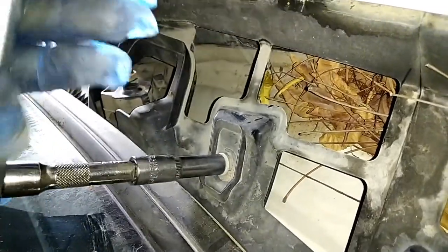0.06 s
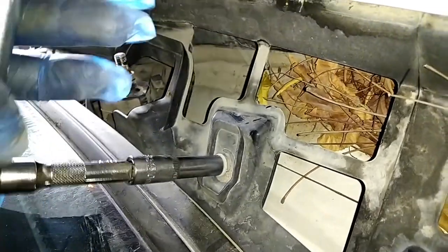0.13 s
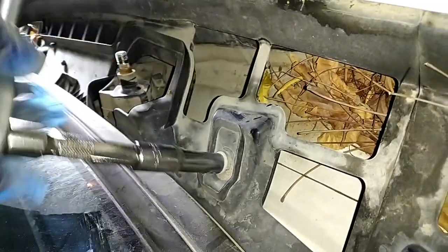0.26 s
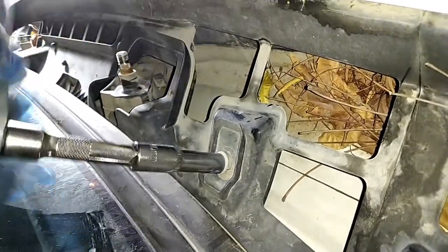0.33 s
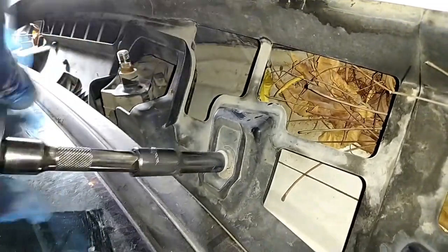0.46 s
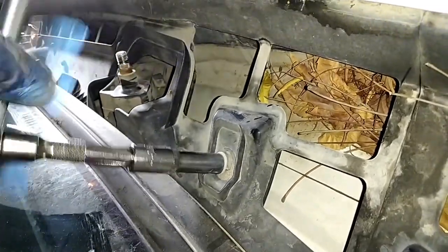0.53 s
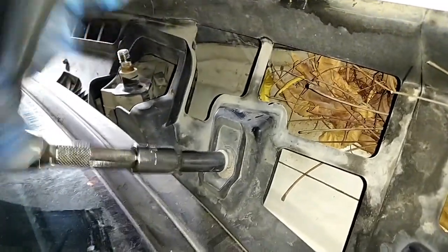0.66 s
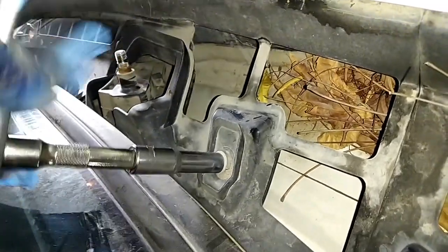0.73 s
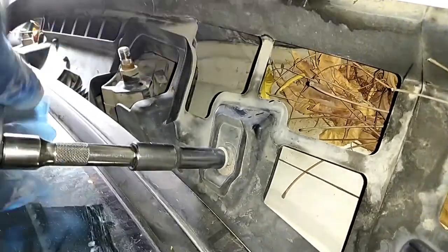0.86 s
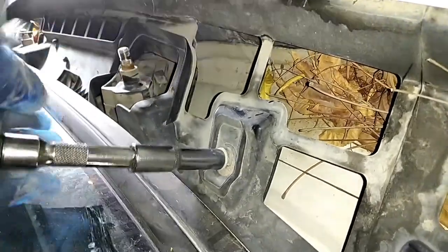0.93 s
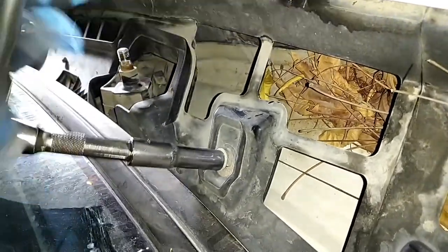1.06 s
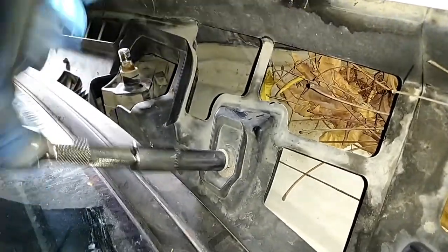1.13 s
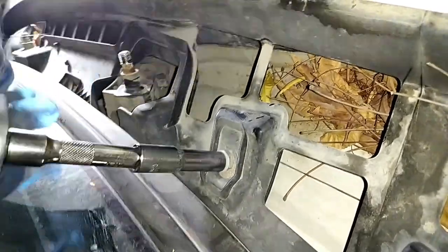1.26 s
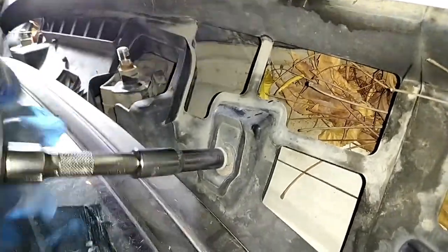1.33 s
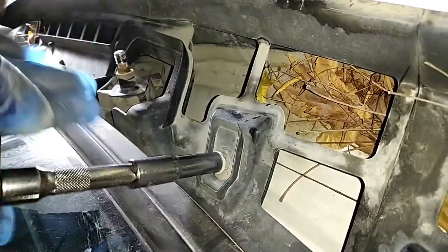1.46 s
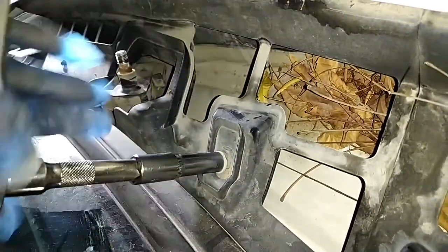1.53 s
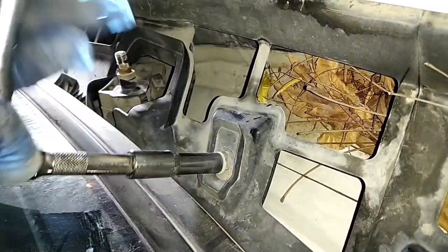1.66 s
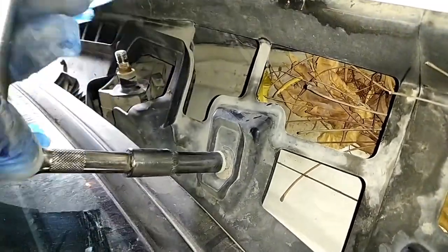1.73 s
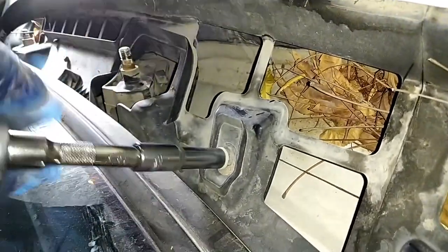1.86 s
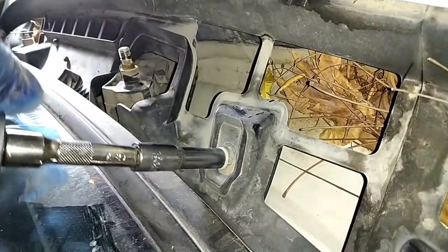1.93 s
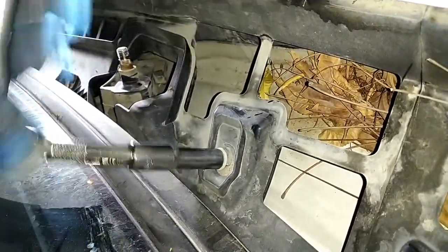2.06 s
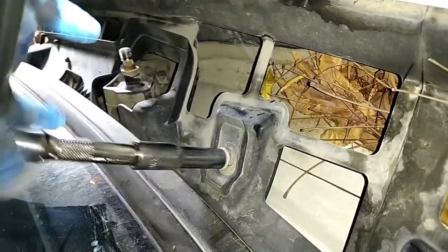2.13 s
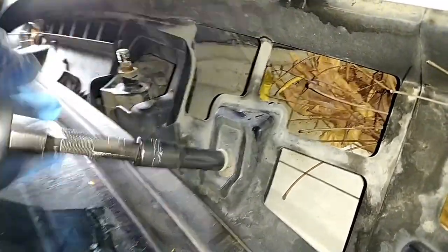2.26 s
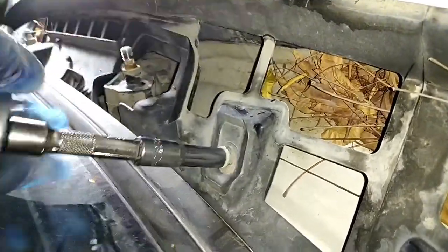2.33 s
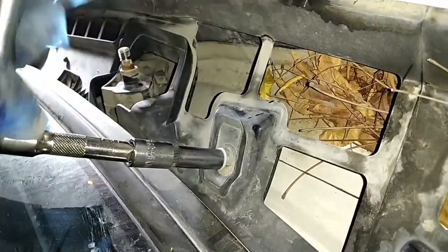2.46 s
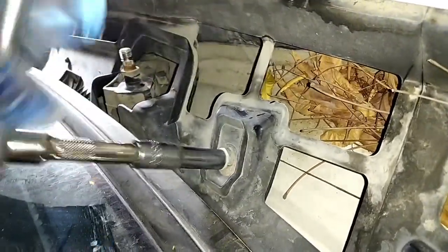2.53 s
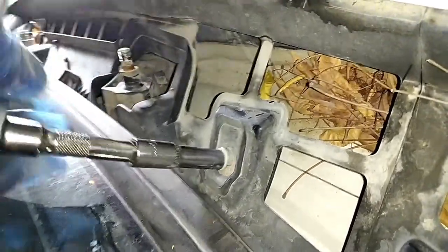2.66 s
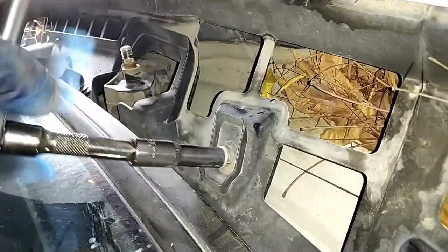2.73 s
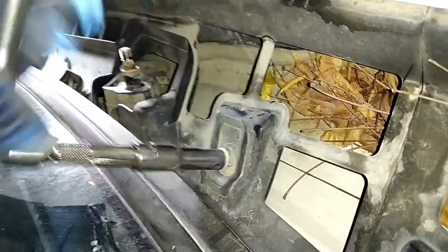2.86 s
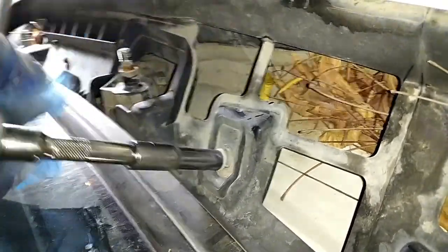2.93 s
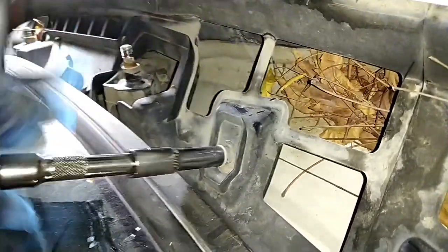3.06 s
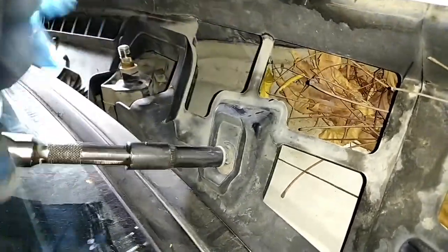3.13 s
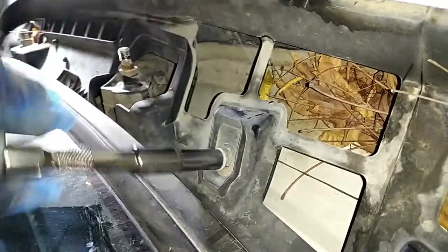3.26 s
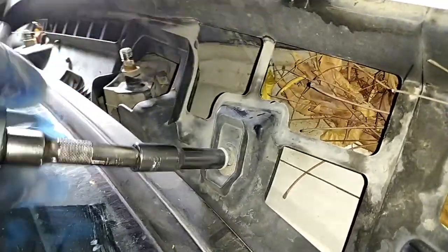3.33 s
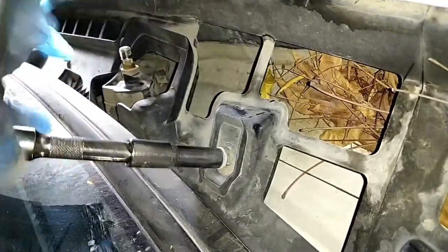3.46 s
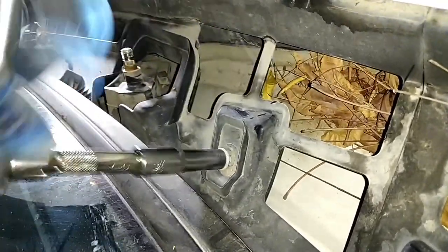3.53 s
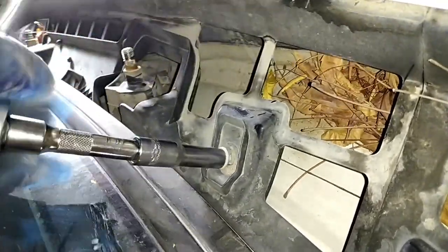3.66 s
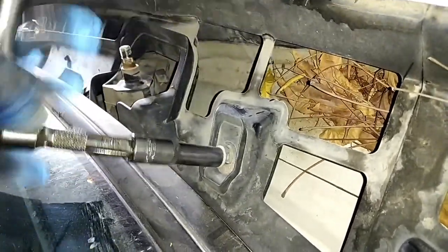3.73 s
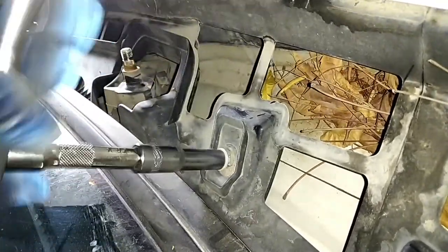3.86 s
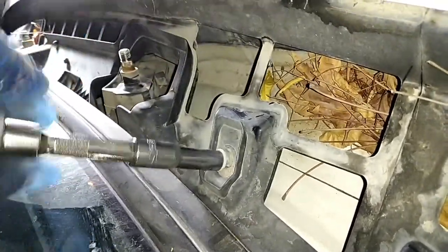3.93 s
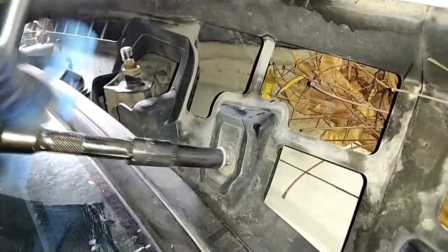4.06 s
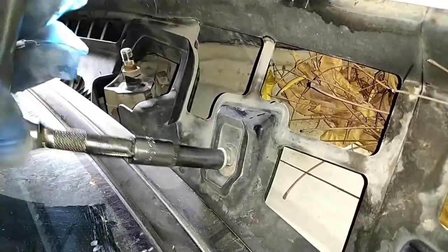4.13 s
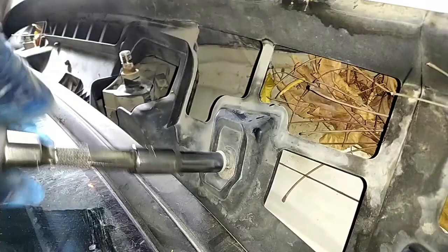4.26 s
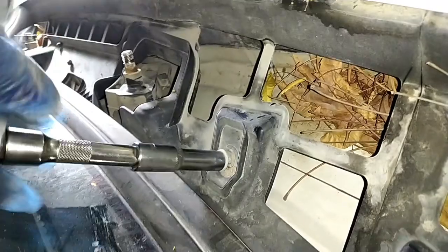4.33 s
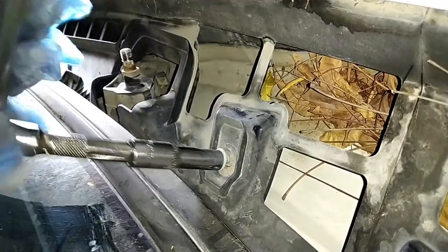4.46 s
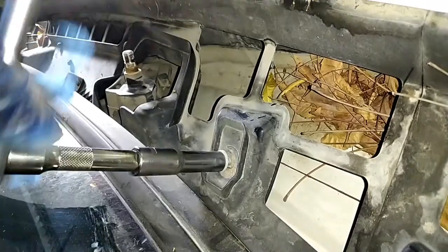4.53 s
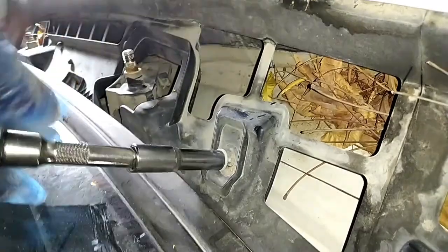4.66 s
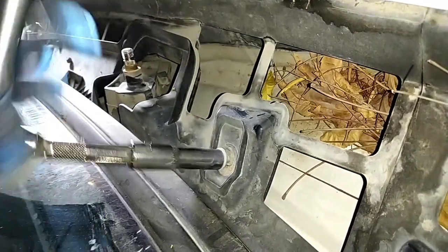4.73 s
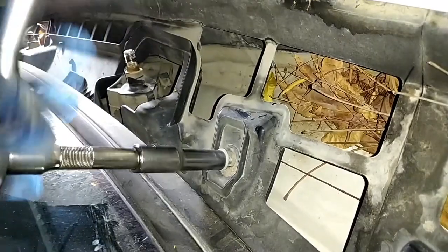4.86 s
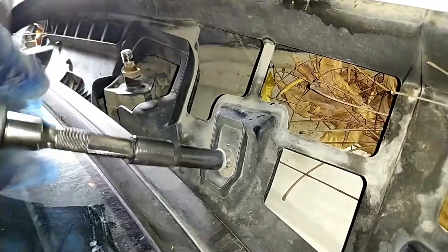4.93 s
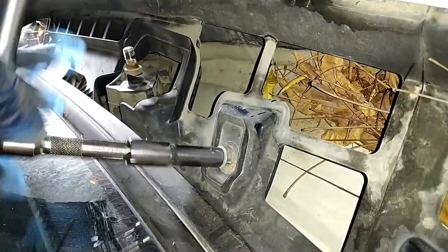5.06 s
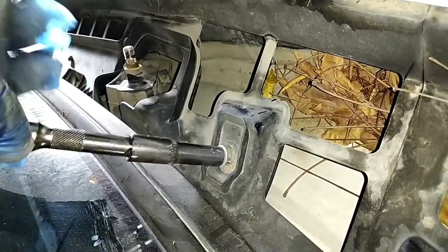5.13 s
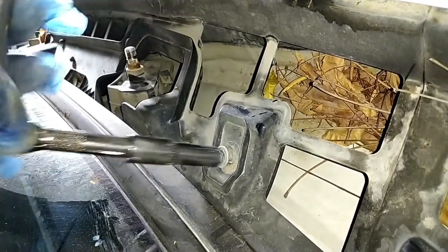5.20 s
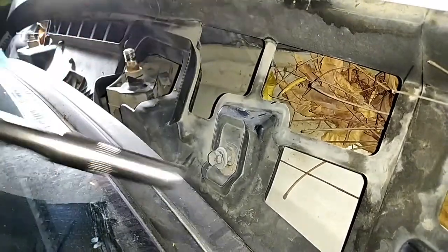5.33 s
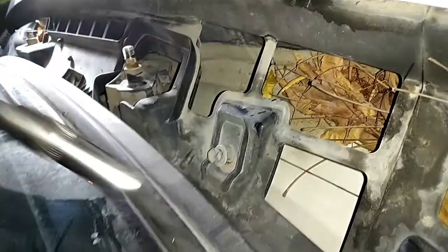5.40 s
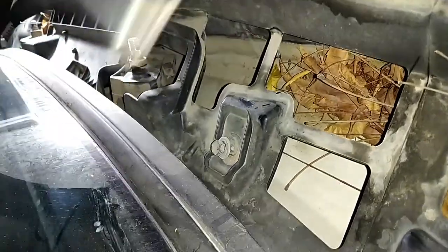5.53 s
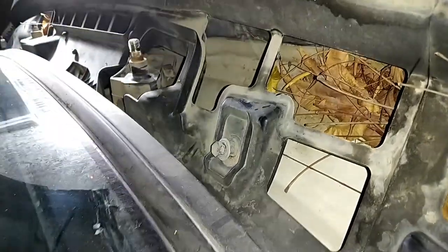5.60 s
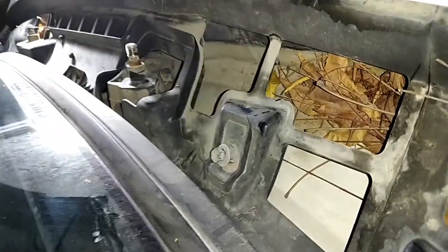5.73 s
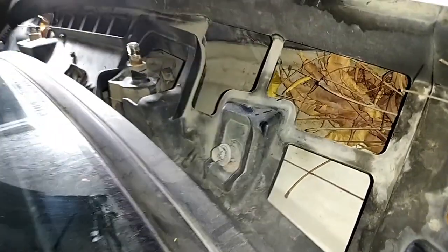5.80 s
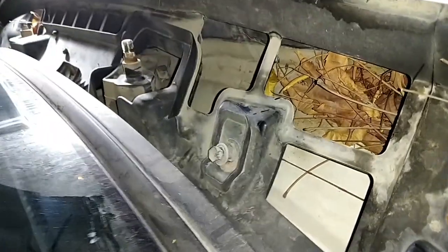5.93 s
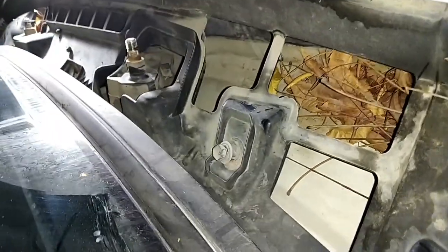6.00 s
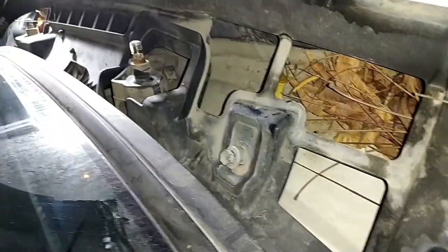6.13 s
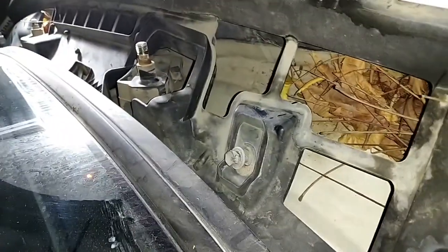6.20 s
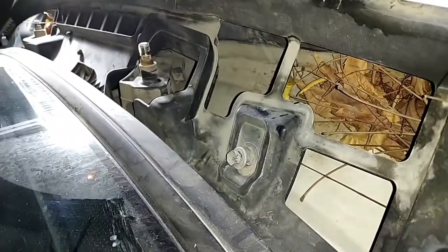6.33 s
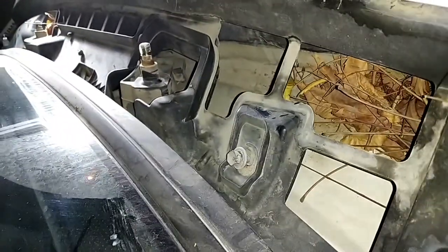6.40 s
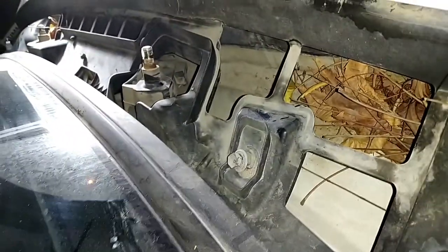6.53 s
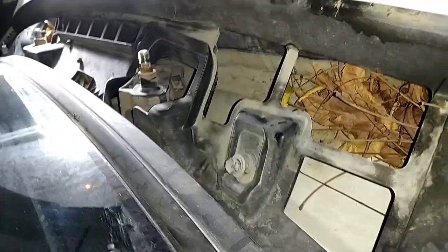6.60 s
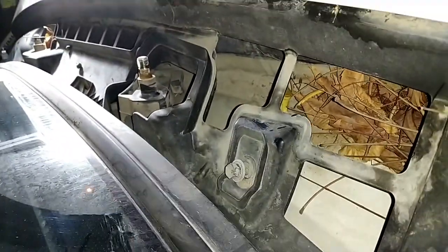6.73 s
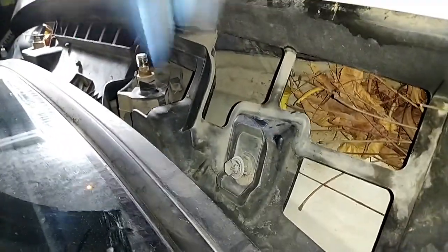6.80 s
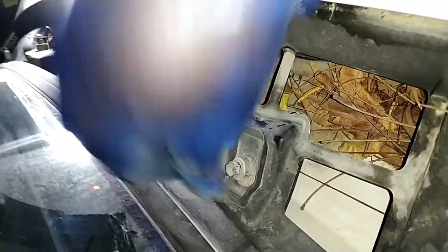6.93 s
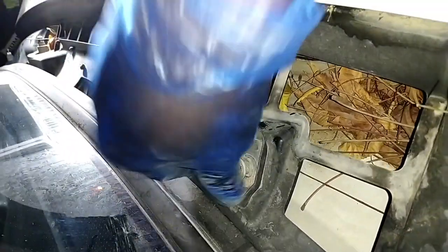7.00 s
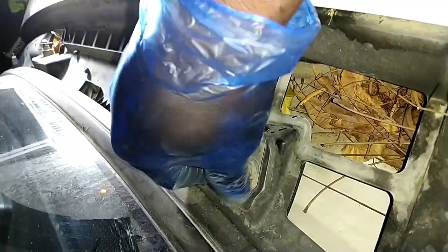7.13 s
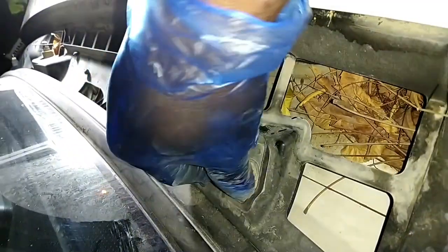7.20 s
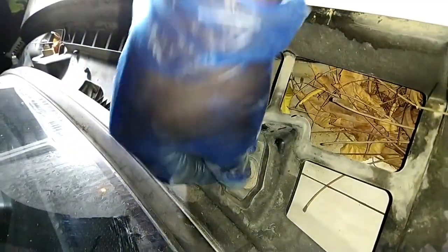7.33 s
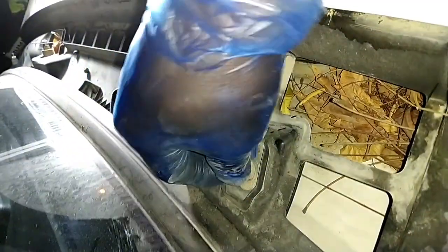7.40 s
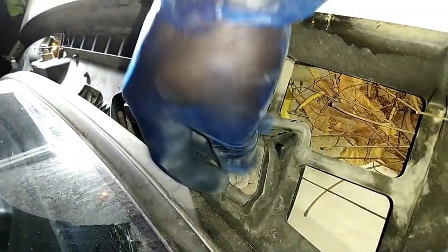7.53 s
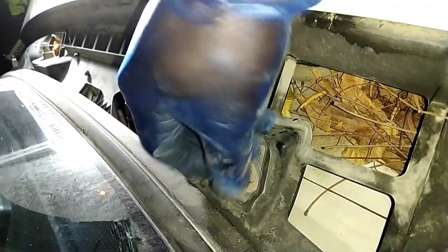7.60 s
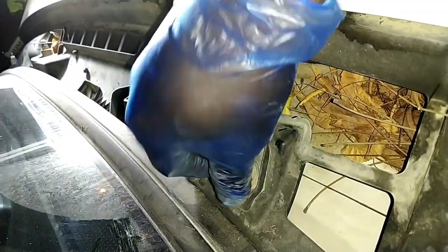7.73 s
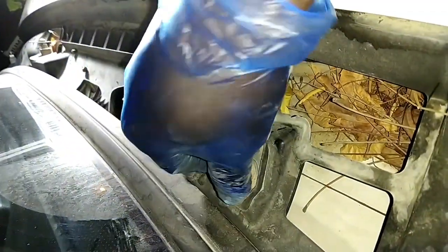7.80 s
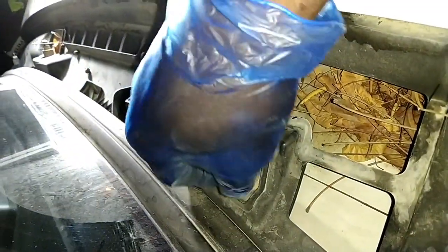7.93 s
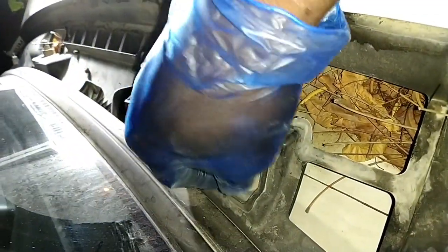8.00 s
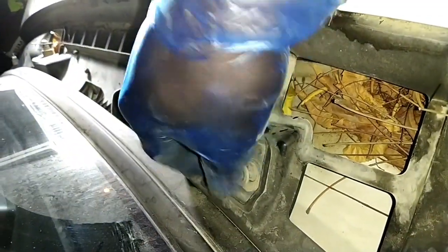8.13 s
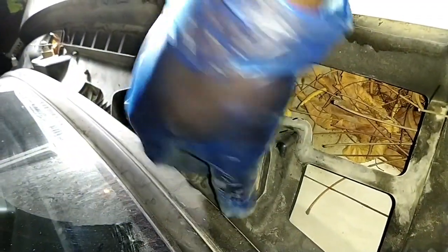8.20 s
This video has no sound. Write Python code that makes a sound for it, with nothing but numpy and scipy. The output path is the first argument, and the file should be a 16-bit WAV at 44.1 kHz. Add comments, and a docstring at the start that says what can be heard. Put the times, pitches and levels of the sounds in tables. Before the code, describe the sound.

A socket ratchet clicks in short fast bursts while a loose metal bracket knocks and rattles, then the tool lands with one booming clang.

```python
"""A socket ratchet backs a bolt out of a car's sheet-metal cowl in a workshop.
The thread rubs by stick-slip under a far rush of noise; loose joints knock the bolt's bracket into modal ringing,
and on each return swing steel impacts sound as the pawl snaps over a few teeth.
Soft bumps and one scrape on a metal edge fall between; then a far insect trills by pulsed tone bursts.
Last, the tool lands on a panel whose modes boom, and glove creases rustle as the rush swells."""
import sys
import numpy as np
from scipy import signal
from scipy.fft import rfft, irfft
from scipy.io import wavfile
from scipy.ndimage import uniform_filter1d

SR = 44100
rng = np.random.default_rng(int(sys.argv[2]) if len(sys.argv) > 2 else 0)


def wav_out(sig):
    """Save sig, one row per channel (or a flat mono array), as 16-bit PCM at SR to the path in sys.argv[1]."""
    wavfile.write(sys.argv[1], SR, np.round(np.clip(np.atleast_2d(sig).T, -1, 1) * 32767).astype(np.int16))


N = 364701
TIME = np.arange(N) / SR


def from_db(db):
    """Logarithmic level: decibels to amplitude gain."""
    return 10 ** (np.asarray(db) / 20)


def rms_one(x):
    """Power normalisation: scale to unit rms."""
    return x / np.sqrt(np.mean(x ** 2) + 1e-20)


def curve(rows):
    """Linear interpolation: a control joined by straight lines in time."""
    return np.interp(TIME, *np.transpose(rows))


def level_curve(rows):
    """Amplitude envelope: a gain from (t/s, level/dB) rows, at -120 dB outside their span."""
    s, db = np.transpose(rows)
    return from_db(np.interp(TIME, s, db, left=-120, right=-120))


def delayed(x, seconds):
    """Propagation delay: the same sound a little later."""
    return np.pad(x, [(0, 0)] * (x.ndim - 1) + [(int(seconds * SR), 0)])[..., :N]


def colour(x, points):
    """Minimum-phase filtering: the cepstrum is folded to make a causal response through (f/Hz, dB) points."""
    size = 8192
    hz, db = np.transpose(points)
    grid = np.arange(size // 2 + 1) * SR / size + 1
    cepstrum = irfft(np.log(from_db(np.interp(np.log(grid), np.log(hz), db))))
    cepstrum[1:size // 2] *= 2
    cepstrum[size // 2 + 1:] = 0
    response = irfft(np.exp(rfft(cepstrum)))
    return signal.oaconvolve(x, response[None], axes=1)[:, :x.shape[1]]


def shaped(x, points):
    """Spectral shaping that conserves the power of white noise."""
    hz, db = np.transpose(points)
    power = np.mean(from_db(np.interp(np.log(np.arange(1, SR // 2)), np.log(hz), db)) ** 2)
    return colour(x, points) / np.sqrt(power)


def pair(alike, size=N):
    """Interchannel coherence: white noise at two microphones with a given correlation."""
    alike = np.clip(alike, -1, 1)
    mid, side = rng.standard_normal((2, size))
    return np.sqrt((1 + alike) / 2) * mid + np.sqrt((1 - alike) / 2) * side * [[1], [-1]]


def flutter(rate, depth_db):
    """Random amplitude modulation: a wandering gain of unit rms."""
    knots = np.arange(0, N / SR + 1, 1 / rate)
    return rms_one(from_db(depth_db * np.interp(TIME, knots, rng.standard_normal(len(knots)))))


def strikes(times, db):
    """Impulsive excitation: one impulse per blow."""
    out = np.zeros(N)
    out[np.round(np.asarray(times) * SR).astype(int)] = from_db(db)
    return out


def dying(hits, t60):
    """Exponential decay: an envelope that jumps at each impulse and falls 60 dB in t60."""
    return signal.lfilter([1], [1, -from_db(-60 / (t60 * SR))], hits + 1e-18)


def ring(x, hz, t60):
    """Damped resonance: a unit impulse rings one mode with an envelope that starts at 1."""
    r, w = from_db(-60 / (t60 * SR)), 2 * np.pi * hz / SR
    return signal.lfilter([0, np.sin(w)], [1, -2 * r * np.cos(w), r * r], x + 1e-18)


def radiate(hits, hz, t60, spread):
    """Modal radiation: a mode reaches the two microphones with a phase difference of its own."""
    tone = ring(hits * rng.choice([-1, 1]), hz, t60)
    return np.array([delayed(tone, abs(spread * rng.normal()) / (2 * np.pi * hz)), tone])


def contacts(times, db, hz, t60, detune, spread):
    """Modal excitation: each contact swells a mode within about a cycle, at a slightly different pitch."""
    t = TIME[:int(t60 * SR)]
    swell = 1 - np.exp(-t * np.mean(hz) / 0.55)
    fading = from_db(-60 * t / t60) * swell * rng.choice([-1, 1])
    pitches = np.broadcast_to(hz, len(times))
    chance = rng.standard_normal((len(times), 2))
    out = np.zeros((2, N + SR))
    for s, gain, pitch, (shift, phase) in zip(times, from_db(db), pitches, chance):
        angle = 2 * np.pi * pitch * (1 + detune * shift) * t
        both = np.sin([np.maximum(angle - abs(spread * phase), 0), angle])  # the left lags in phase
        start = round(s * SR)
        out[:, start:start + len(t)] += gain * fading * both
    return out[:, :N]


def workshop(x, t60, dull_hz):
    """Diffuse reverberation: a tail duller than the direct sound and alike at both microphones in the bass."""
    t = TIME[:SR]
    mid, side = rng.standard_normal((2, SR)) * from_db(-60 * t / t60) * (t > .008)
    side = signal.sosfilt(signal.butter(1, 600, "high", fs=SR, output="sos"), side)
    tail = (mid + side * [[1], [-1]]) / np.sqrt(2 * np.sum(mid ** 2))
    tail = signal.lfilter(*signal.butter(1, min(dull_hz, SR / 3), fs=SR), tail)
    return signal.oaconvolve(x, tail, axes=1)[:, :N]


SWING_GAP_S = .1   # a longer pause between snaps begins a new swing


def teeth():
    """Event grouping: snap times of the pawl, split by swing."""
    s = np.transpose(PAWL_SNAPS)[0]
    return np.split(s, np.flatnonzero(np.diff(s) > SWING_GAP_S) + 1)


# how hard the hand works the wrench: [t/s, level/dB]
HAND_EFFORT = [(0, -18), (.11, -22), (.16, 0), (.3, -18), (.4, -3), (.66, -0.5), (.79, -19), (.9, -0.5),
               (1.27, -1), (1.42, -12.5), (1.82, -8.5), (2.03, -0.5), (3.1, 0), (3.65, -4), (4.12, -3.5),
               (4.5, 1), (5.04, -3), (5.18, -11), (5.3, -24)]
# modes of the cowl bracket that holds the bolt: [f/Hz, level/dB, t60/s]
BRACKET_MODES = [(154.5, -11.5, 0.17), (255, -10, 0.073), (341, -16, 0.08), (417.5, -2.5, 0.059),
                 (505, -6, 0.055), (604, -2.5, 0.044), (686.5, -5, 0.061), (876, -15.5, 0.1),
                 (1010, -15.5, 0.062), (1112, -13, 0.039), (1250, -16, 0.079), (1345, -7, 0.047),
                 (1550, -12, 0.025), (1742, -10.5, 0.048), (1820, -15.5, 0.074), (1970, -10.5, 0.045),
                 (2156, -4.5, 0.023), (2996, -4.5, 0.021)]
# spectrum of thread friction and of the slack's rattle: [f/Hz, density/dB]
RUB_SPECTRUM = [(150, -21.5), (250, -17), (321, -6), (425, -2.5), (538, -6.5), (682, -9.5), (795, -12),
                (1330, -19.5), (1620, -13), (1760, -18.5), (2570, -19.5), (3210, -16.5), (7000, -40),
                (9100, -58), (15400, -120)]
# spectrum of the panel's rumble: [f/Hz, density/dB]
RUMBLE_SPECTRUM = [(15, -47), (25, -17), (129, 4.5), (221, 0.5), (330, -4.5), (430, -24.5), (730, -120)]
# spectrum of the glove's rustle: [f/Hz, density/dB]
RUSTLE_SPECTRUM = [(400, -44.5), (1290, -18), (2100, -12), (2700, -17.5), (3900, -18.5), (4410, -12),
                   (4940, -16.5), (6410, -17.5), (10400, -6.5), (13900, -15.5), (14500, -22),
                   (15200, -81.5)]
RUB_DB, RUMBLE_DB, GRIP_DB = -41.5, -40, -51.5   # relative levels where the effort is 0 dB
RUMBLE_FOLLOWS = 0.62   # share of the effort's swing in dB
RETURN_DB = 3.5   # added to the rub between the first and last snap of a swing
# after each swing the working stroke bites, then eases off; BITE_DB is the added rub against the steady rub
BITE_DELAY_S, BITE_RISE_S, BITE_FALL_S, BITE_DB = 0.032, 0.024, 0.034, 5


def thread():
    """Stick-slip friction: random jerks ring the bracket, most at each bite; rumble and rustle follow effort."""
    effort = level_curve(HAND_EFFORT)
    bite, swinging = 0, 0
    for snaps in teeth():
        since = np.maximum(TIME - snaps[-1] - BITE_DELAY_S, 0)
        bite = bite + np.minimum(since / BITE_RISE_S, np.exp((BITE_RISE_S - since) / BITE_FALL_S))
        swinging = swinging + (TIME > snaps[0]) * (TIME < snaps[-1])
    rub = from_db(RUB_DB + RETURN_DB * swinging) * effort * (1 + from_db(BITE_DB) * bite)
    rumble = from_db(RUMBLE_DB) * effort ** RUMBLE_FOLLOWS
    rustle = from_db(GRIP_DB) * effort * (1 + 1.9 * bite)
    slips = (rng.random(N) < 90 / SR) * rng.standard_normal(N)   # about 90 a second
    jerks = rms_one(sum(from_db(level) * radiate(slips, hz, t60, 0.4)
                        for hz, level, t60 in BRACKET_MODES if hz < 1400))
    friction = shaped(pair(0.24) * flutter(90, 8.2), RUB_SPECTRUM)
    return (rub * from_db(-2.5) * (jerks + friction)
            + rumble * shaped(pair(1.0) * flutter(35, 4.2), RUMBLE_SPECTRUM)
            + rustle * shaped(pair(0.092) * flutter(150, 6.3), RUSTLE_SPECTRUM))


# the far rush swells toward the end: [t/s, relative level/dB]
RUSH_SWELL = [(0, -60), (5.42, -61), (5.85, -54.5), (6.8, -51.5), (7.3, -49.5), (7.7, -45.5), (8.0, -41),
              (8.27, -41.5)]
# hollow tone of the rush: [t/s, f/Hz, strength of the ground reflection 0-1]
HOLLOW_TONE = [(5.2, 1094, .85), (5.55, 920, 1), (5.85, 777, 0.4), (6.4, 849, 0.55), (6.9, 937, 0.02),
               (7.4, 969, 0.06), (8.27, 894, 0)]
# low part of the rush, also the landing's drone: [f/Hz, density/dB]
LOW_SPECTRUM = [(15, -96), (25, -51), (32, -27), (54, -17), (77, -6), (150, -6.5), (188, -3.5), (264, -3),
                (385, -15), (450, -12), (580, -35.5), (990, -120)]
# middle part of the rush: [f/Hz, density/dB]
MIDDLE_SPECTRUM = [(210, -24), (350, 6), (388, -7), (554, 5.5), (729, -1.5), (807, 3.5), (1230, -3),
                   (2610, -19), (4000, -20.5), (5200, -55.5), (8800, -120)]
MID_RUSH_DB, MID_RUSH_FOLLOWS = -41.5, 1.14   # at its fullest; share of the swell in dB


def far_rush():
    """Comb filtering: broadband noise meets its ground reflection, delayed by one period of a drifting tone."""
    rush_db = curve(RUSH_SWELL)
    low = from_db(rush_db + 4.0)
    middle = from_db(MID_RUSH_DB + MID_RUSH_FOLLOWS * (rush_db - rush_db.max()))
    whoosh = low * shaped(pair(0.96), LOW_SPECTRUM) + middle * shaped(pair(0.47), MIDDLE_SPECTRUM)
    tone_hz, ground = (curve(np.array(HOLLOW_TONE)[:, [0, k]]) for k in (1, 2))
    reflected = np.array([np.interp(TIME - 1 / tone_hz, TIME, side) for side in whoosh])
    rush = (whoosh + ground * reflected) / np.hypot(1, ground)
    # narrow noise is carried up to the tone's pitch
    narrow = signal.sosfilt(signal.butter(4, 125, fs=SR, output="sos"), pair(0.46))
    hollow = rms_one(narrow * np.cos(2 * np.pi * np.cumsum(tone_hz) / SR))
    return rush + from_db(-57.5) * hollow * (TIME > HOLLOW_TONE[0][0])


def crinkle():
    """Crackling noise: steady noise plus tiny creases of very uneven size; unit rms."""
    creases = (rng.random(N) < 260 / SR) * from_db(3.24 * np.minimum(rng.exponential(1, N), 4))
    return rms_one(pair(0.22) * (3.0 + dying(creases, 0.025)))


# the glove slides and creases: [middle t/s, half length/s, relative level/dB]
GLOVE_SLIDES = [(0.11, 0.037, -53.5), (0.347, .015, -53), (0.672, 0.028, -51), (2.5, 0.01, -69),
                (3.478, 0.021, -46), (4.567, 0.039, -69), (4.76, 0.017, -41), (5.448, 0.0078, -41.5),
                (5.55, 0.32, -54), (6.437, 0.029, -45.5), (6.913, 0.0096, -52), (7.003, 0.014, -49.5),
                (7.388, 0.031, -44), (7.662, 0.052, -52), (7.989, 0.03, -44), (8.169, 0.0088, -44)]
# light brushes and touches of tool and glove: [t/s, relative level/dB]
LIGHT_TOUCHES = [(5.436, -58), (5.908, -28), (6.2287, -34.5), (6.511, -26), (7.3562, -39), (7.9618, -44),
                 (8.1577, -41)]
HISS_DB = -62   # steady rustle, on the same scale as the slides


def glove():
    """Modulated crackle and decaying noise: the glove rustles and lightly touches."""
    rustle = from_db(HISS_DB)
    for s, half, db in GLOVE_SLIDES:
        rustle = rustle + from_db(db) / np.hypot(1, ((TIME - s) / half) ** 2)
    creasing = from_db(-2.0) * rustle * shaped(crinkle() * flutter(30, 1.7), RUSTLE_SPECTRUM)
    s, db = np.transpose(LIGHT_TOUCHES)
    touches = shaped(pair(0.13) * dying(strikes(s, db), 0.4) * flutter(300, 1.4),
                     [(200, -45), (1400, 12.0), (2700, 2.5), (4000, 1.5), (7000, -6.5),
                      (10500, 1.0), (15000, -25)])
    return creasing + from_db(-14.0) * touches


# the extension takes up its slack and knocks the bolt:
# [t/s, relative level/dB, hardness/dB, strongest ring f/Hz]
BOLT_KNOCKS = [(0.137, -25, 3.5, 420), (0.152, -24.5, 3, 440), (0.175, -21.5, -5, 420),
               (0.206, -21, -3, 410), (0.383, -7, -3.5, 426), (0.586, -21.5, -1, 390),
               (0.609, -11, -6.5, 410), (0.649, -15, 2.5, 420), (0.867, -8.5, 1, 395),
               (1.059, -16.5, -1.5, 400), (1.15, -17, 2.5, 460), (1.176, -21.5, -8, 440),
               (1.213, -17, -19, 605), (1.25, -8.5, -2, 400), (1.364, -26, -8, 432),
               (1.613, -26.5, -8, 410), (1.709, -29.5, -17, 272), (1.77, -24.0, -1, 430),
               (1.86, -22.0, -5, 470), (1.891, -9.0, 1, 409), (2.063, -12.5, -8.5, 406),
               (2.084, -19.5, 4, 675), (2.171, -23.5, 6, 403), (2.21, -16, -6.5, 418),
               (2.249, -16, -14, 270), (2.431, -15.5, -4, 400), (2.478, -21.5, 3.5, 412),
               (2.503, -27, 1, 710), (2.578, -20, -3, 378), (2.604, -14, 6.5, 424), (2.76, -17.5, 0, 635),
               (2.778, -17, -15, 467), (2.803, -17.5, 4, 425), (2.843, -26, 5, 410), (2.944, -5.5, 3, 420),
               (3.091, -23.5, 8.5, 340), (3.131, -21.5, 4, 422), (3.143, -15.5, -5, 410),
               (3.159, -18.0, -9, 407), (3.201, -19.0, -7, 380), (3.23, -21.5, -13, 567),
               (3.251, -20.5, -1, 670), (3.422, -16, -1, 230), (3.468, -21, -2, 280), (3.514, -17, -6, 420),
               (3.532, -30, 1, 430), (3.567, -21, 6.5, 500), (3.739, -27.5, -21, 410),
               (3.812, -12, -4.5, 456), (3.841, -22.5, 2, 676), (3.862, -19, -5, 614),
               (3.885, -20.5, -9, 390), (3.923, -5.5, 6, 406), (4.084, -17.5, 7.5, 435),
               (4.196, -24, 5.5, 680), (4.253, -14, -1, 356), (4.284, -21, 1, 404), (4.402, -20, -12, 493),
               (4.419, -22.5, 8, 620), (4.437, -19.5, 5, 355), (4.464, -24, 6, 393),
               (4.51, -21.0, 1.5, 442), (4.535, -29, -9, 460), (4.565, -15, -9, 666), (4.588, -20, 2, 428),
               (4.649, -25.5, 6, 300), (4.755, -15, 0.5, 453), (4.768, -19.5, -6, 424),
               (4.836, -9.5, -1.5, 450), (4.898, -13, -0.5, 675), (4.945, -15.5, 6, 424),
               (4.987, -24.5, -2, 620), (5.1, -14, -6.5, 240)]
LIGHT_KNOCK_DB, BASS_LAG = -19.5, 0.27   # bass grows less than the blow: dB lost per dB above a light knock
HARDNESS_PIVOT_HZ, HARDNESS_TOP_HZ = 422, 1400   # hardness tilts about the pivot, in full from the top upward
FAVOUR_DB, FAVOUR_WIDTH = 4.5, 0.11   # the load favours modes near one pitch; width as a share of that pitch
GRIP_DETUNE = 0.01   # typical share by which pitch shifts between contacts as grip and load change
REBOUND_DULL_DB = 5   # the slack rebounds more softly than it first strikes: loss in the high modes


def bracket():
    """Modal synthesis: a knock rings the bracket, a hard one more in its high modes, and the slack rattles."""
    s, db, hard, ring_hz = np.transpose(BOLT_KNOCKS)
    bass = -BASS_LAG * (db - LIGHT_KNOCK_DB)
    rebounds = s[:, None] + np.cumsum(rng.uniform(0.002976, .012, (len(s), 3)), axis=1)
    times = np.column_stack([s, rebounds])
    weaker = np.append(0, -11 - 4 * np.arange(3))
    ringing = 0
    for hz, level, t60 in BRACKET_MODES:
        tilt = min(np.log(hz / HARDNESS_PIVOT_HZ) / np.log(HARDNESS_TOP_HZ / HARDNESS_PIVOT_HZ), 1)
        favour = np.exp(-(np.log(hz / ring_hz) / FAVOUR_WIDTH) ** 2)
        first = db + level + bass * (hz < 300) + hard * tilt + FAVOUR_DB * favour
        strength = first[:, None] + weaker - REBOUND_DULL_DB * max(tilt, 0) * (weaker < 0)
        strength = strength + 2.46 * rng.standard_normal(times.shape)
        pitch = np.repeat(hz + favour * (ring_hz - hz), times.shape[1])
        ringing = ringing + contacts(times.ravel(), strength.ravel(), pitch, t60, GRIP_DETUNE, spread=0.28)
    rattle = shaped(pair(0.58) * dying(strikes(s, db), 0.083) * flutter(250, 3.8), RUB_SPECTRUM)
    return from_db(-9.0) * ringing + from_db(-16.5) * rattle


# spectrum of the steel ratchet head: [f/Hz, density/dB]
STEEL_SPECTRUM = [(150, -21.5), (420, 5.5), (900, -5), (1350, -5), (1900, -1.5), (2550, -9), (3200, 4),
                  (3700, -1.5), (5000, 2.5), (6100, -4), (7100, -1.5), (8300, -1.5), (10100, 8.5),
                  (12000, 3.5), (13200, 2), (14300, 0), (16000, -4)]
# longer modes of ratchet head and extension: [f/Hz, level/dB, t60/s]
HEAD_MODES = [(1342, -8.5, 0.085), (1780, -13.5, 0.098), (3210, -10.5, 0.038), (4170, -10.5, 0.048),
              (4920, -8.5, 0.021), (5030, -5.5, 0.04), (5800, -19, 0.05), (6910, -7.5, .029),
              (7470, -2.5, 0.023), (10170, -0.5, 0.015), (10090, 11, 0.0074), (12200, -15, .04),
              (12316, -7, .04), (12900, -10.5, .045)]
SNAP_RISE_S = 0.00095   # the head takes a moment to sound in full


def steel(rows, t60, chatter_db, ring_db, bounce_s, bounce_db):
    """Impact and modal density: steel strikes, bounces once, and rings dense short modes and a few longer ones."""
    s, db = np.transpose(rows)
    chance = rng.standard_normal((len(s), 2))
    bounces = strikes(s + bounce_s * from_db(2 * chance[:, 0]), db + bounce_db + chance[:, 1])
    hits = strikes(s, db) + bounces
    t = TIME[:SR // 10]
    fading = from_db(-60 * t / t60) * (1 - np.exp(-t / SNAP_RISE_S))
    # the dense modes change partly with the seat of contact
    seat = rng.choice(4, N)
    head = pair(0.032, size=len(t))
    body = 0
    for k in np.unique(seat):
        answer = (0.88 * head + 0.91 * pair(0.037, size=len(t))) * fading
        body = body + signal.oaconvolve((hits * (seat == k))[None], answer, axes=1)[:, :N]
    chatter = from_db(chatter_db) * pair(0.28) * dying(hits, t60) * flutter(1500, 4.0)
    tones = sum(contacts(s, db + level + rng.normal(0, 3, len(s)), hz, decay, .003, 1.2)
                for hz, level, decay in HEAD_MODES)
    return shaped(body + chatter, STEEL_SPECTRUM) + from_db(ring_db) * tones


PLAY_TICKS_PER_S, PLAY_TICK_DB = 6.1, -40.5   # rate where effort is 0 dB; mean relative level


def play():
    """Random point process: faint chance contacts of loose joints, more frequent with effort: [t/s, level/dB]."""
    work = np.cumsum(level_curve(HAND_EFFORT)) / SR
    chance = rng.random((100, 2))
    due = (np.arange(len(chance)) + chance[:, 0]) / PLAY_TICKS_PER_S
    rows = np.column_stack([np.interp(due, work, TIME), PLAY_TICK_DB + 8 * (chance[:, 1] - .5)])
    return rows[due < work[-1]]


# the pawl snaps over one tooth, a run of them on each return swing:
# [t/s, relative level/dB, clack below CLACK_HZ/dB, ring from there to RING_HZ/dB]
PAWL_SNAPS = [(0.4388, -10, -4.5, -3), (0.4542, -7.5, -9, -3), (0.469, -15.5, 3.5, -5),
              (0.4873, -10.5, -3.5, -4), (0.506, -11, 1.5, 0.5), (0.5268, -16, -2.5, 3.5),
              (0.9319, -13, -1, 0.5), (0.945, -11.5, -4, 0), (0.9595, -12.5, 1, 0),
              (0.976, -10.5, -2.5, -1), (0.9933, -13, -1, 3), (1.3403, -13, -8.5, -4),
              (1.5379, -13, -0.5, -6), (1.9645, -9.5, -0.5, -5), (1.977, -14, 5.5, -9), (1.9875, -11, 1, 1),
              (2.0011, -13, 1, -2), (2.014, -12.5, 3, 2), (2.0376, -14, -6, 5.5), (2.3275, -9.5, -3.5, -2),
              (2.3446, -14, -2, 1), (2.3593, -11.5, -6, 2.5), (2.3725, -12.5, -11, -6),
              (2.3943, -13.5, -2, 0), (2.6457, -15, -3, 0.5), (2.663, -9.5, -0.5, 0.5),
              (2.677, -13.5, -1.5, -3), (2.6897, -13, -3, -5), (2.7055, -10.5, 0, -10), (2.72, -10.5, 2, 1),
              (2.9851, -14.5, -2, 4), (3.0004, -15, -4, 7.5), (3.0145, -14.5, 2, 4.5),
              (3.0248, -13, -2, -1), (3.033, -13.5, -7, 4), (3.0411, -12.5, -4.5, 2), (3.057, -13, -2.5, 4),
              (3.325, -15, -4.5, 3), (3.3407, -12, -10, 1), (3.3546, -13, -1.5, 3.5),
              (3.3677, -11.5, -2, -1), (3.3838, -13.5, 1, 2), (3.6312, -16, -0.5, 8),
              (3.6467, -13.5, -2, 1), (3.6625, -13.5, -1, 4), (3.6772, -13.5, 4, 3), (3.6959, -16.5, 1, 5),
              (3.9761, -13, -1, 3), (3.9878, -13, 0, 1.5), (4.0011, -12.5, 2.5, -1), (4.0142, -9, -2, 1),
              (4.0304, -12, 2, 3), (4.3172, -10, -2.5, -5.5), (4.3283, -12, -8, 1.5),
              (4.3423, -12, 0.5, -1), (4.3567, -18, 5.5, 6), (4.6756, -13.5, -7, -3),
              (4.6997, -10.5, -4, -3.5), (5.0065, -14, -2.5, 0.5), (5.0319, -15, 1, -2.5)]
CLACK_HZ, RING_HZ = 4000, 8500


def seated(pawl):
    """Band-wise gain: each tooth seats differently, so every snap has its own share of clack and ring."""
    s, db, clack_db, ring_db = np.transpose(PAWL_SNAPS)
    latest = np.maximum(np.searchsorted(s, TIME) - 1, 0)
    clack, ringing = uniform_filter1d(from_db([clack_db, ring_db])[:, latest], size=40, axis=1)
    below, within = (signal.sosfiltfilt(signal.butter(3, hz, fs=SR, output="sos"), pawl)
                     for hz in (CLACK_HZ, RING_HZ))
    return clack * below + ringing * (within - below) + pawl - within


# steel-on-steel ticks from play in socket and extension: [t/s, relative level/dB]
LOOSE_TICKS = [(.35, -27.5), (.375, -13.5), (.427, -35), (.5, -15), (.521, -25), (.592, -28.5), (.632, -28),
               (.847, -20.5), (.86, -17.5), (1.063, -22.5), (1.152, -28), (1.175, -27), (1.215, -27.5),
               (1.235, -22), (1.249, -20), (1.857, -22), (1.87, -32), (1.882, -20), (1.89, -15.5),
               (1.955, -19), (2.145, -29), (2.156, -30), (2.174, -27.5), (2.228, -23.5), (2.24, -35),
               (2.26, -33), (2.45, -22.5), (2.574, -19.5), (2.587, -31), (2.757, -21), (2.786, -21),
               (2.797, -23), (2.926, -18), (2.934, -24), (2.972, -18.5), (3.094, -24), (3.103, -17),
               (3.2, -22.5), (3.265, -31), (3.412, -19), (3.457, -25.5), (3.468, -28), (3.564, -17),
               (3.839, -29), (3.858, -25), (3.924, -11), (3.967, -24), (4.064, -20.5), (4.094, -19),
               (4.243, -28), (4.309, -15.5), (4.41, -20.5), (4.42, -24), (4.496, -26), (4.569, -23),
               (4.647, -31), (4.663, -24), (4.731, -16.5), (4.763, -21.5), (4.832, -17), (4.858, -24),
               (4.89, -26), (4.994, -21), (5.18, -26.5), (5.253, -31.5), (6.231, -40)]
# rasp of the pawl climbing a tooth: [f/Hz, density/dB]
CLIMB_SPECTRUM = [(200, -26), (500, 6), (900, 2.5), (1400, 2), (2400, 7.5), (3200, 4), (4500, 7.5),
                  (6200, -3), (8000, 4), (10000, 6.5), (14300, 2.5)]


def ratchet():
    """Repeated impact: the pawl snaps and rasps up the next tooth; ticks between, one echo from the raised bonnet."""
    s, db = np.transpose(PAWL_SNAPS)[:2]
    snaps = steel(np.column_stack([s, db]), t60=0.025, chatter_db=-8.5, ring_db=-8.0,
                  bounce_s=.0015, bounce_db=0.0)
    pawl = from_db(-0.5) * seated(snaps)
    loose = np.vstack([LOOSE_TICKS, play()])
    ticks = from_db(-1.0) * steel(loose, t60=0.013, chatter_db=-1.0, ring_db=-15,
                                  bounce_s=0.0016, bounce_db=-12.0)
    swinging = np.append(np.diff(s) < .021, False)   # the next tooth follows at once
    climbing = dying(strikes(s[swinging] + .007, db[swinging]), 0.06)
    rasp = shaped(pair(0.088) * climbing * flutter(450, 2.7), CLIMB_SPECTRUM)
    direct = pawl + ticks + from_db(-11) * rasp
    return direct + from_db(-23.5) * delayed(direct, .0205)


# the hand bumps the bodywork and damps it at once: [t/s, relative level/dB, f/Hz, t60/s]
HAND_BUMPS = [(1.274, -20.5, 115, 0.053), (5.117, -24, 239, 0.12), (6.924, -27.5, 322, 0.03),
              (7.39, -31, 546, 0.021)]


def thuds():
    """Heavily damped resonance: a soft bump sounds one note of the panel under the hand, with a brief dull rub."""
    notes = sum(radiate(strikes([s], [db]), hz, t60, .1) for s, db, hz, t60 in HAND_BUMPS)
    s, db, hz, t60 = np.transpose(HAND_BUMPS)
    rub = shaped(pair(0.96) * dying(strikes(s, db), 0.14),
                 [(100, -13), (200, 6.0), (450, 0.5), (700, -18), (1500, -22), (4000, -60)])
    return notes + from_db(-8) * rub


# the wrench slides briefly along a metal edge: [t/s, relative level/dB]
SLIDE_LEVEL = [(1.427, -38), (1.436, -0.5), (1.46, -3.5), (1.5, -5), (1.54, -11), (1.6, -34)]
# modes that ring in that slide: [f/Hz, relative level/dB]
SLIDE_MODES = [(2762, -64), (3138, -55), (3828, -58), (4134, -57), (4700, -66), (5529, -71), (6078, -70),
               (6347, -70), (6869, -73), (7418, -67), (7768, -49), (9049, -66), (9663, -52), (9841, -52)]
# hiss of that slide: [f/Hz, density/dB]
SLIDE_SPECTRUM = [(300, -32), (1500, -1), (3800, -2), (6000, -8), (8700, -13), (10000, -4), (15000, -8)]


def scrape():
    """Noise-driven resonance: steel slides on a metal edge, a rasp that keeps a few modes ringing."""
    lines = sum(from_db(db) * rms_one(ring(pair(0.19), hz, 0.32)) for hz, db in SLIDE_MODES)
    hiss = shaped(pair(0.19) * flutter(370, 2.9), SLIDE_SPECTRUM)
    return level_curve(SLIDE_LEVEL) * (from_db(6.0) * lines + from_db(-42) * hiss)


# insect chirps: [t/s, relative level/dB]
INSECT_CHIRPS = [(4.569, -55), (5.23, -54), (5.889, -57), (6.585, -56), (7.178, -55.5), (7.851, -56.5)]
CHIRP_HZ, CHIRP_WANDER_HZ, WING_STROKE_S = 4460, 35, 0.013
CHIRP_LAG_S = .00007   # it sits off to one side: the left lags


def insect():
    """Pulsed tone: wings scrape about 77 times a second in short trills, the pitch wavering between strokes."""
    s = np.concatenate([start + np.arange(15) * WING_STROKE_S for start, db in INSECT_CHIRPS])
    db = np.repeat([db for start, db in INSECT_CHIRPS], len(s) // len(INSECT_CHIRPS))
    strokes = strikes(s + rng.normal(0, 0.00052, len(s)), db + rng.normal(0, 1.5, len(s)))
    strokes = strokes * rng.choice([-1, 1], N)
    trill = signal.oaconvolve(strokes, np.hanning(int(0.0052 * SR)))[:N]
    pitch = np.interp(TIME, s, CHIRP_HZ + CHIRP_WANDER_HZ * rng.standard_normal(len(s)))
    cycles = np.cumsum(pitch) / SR
    return from_db(-0.5) * trill * np.sin(2 * np.pi * np.array([cycles - CHIRP_HZ * CHIRP_LAG_S, cycles]))


# the tool chatters on the panel as it comes to rest: typical rate, decay and relative starting level
CHATTER_PER_S, CHATTER_T60_S, CHATTER_DB = 59, 0.61, -7


def settling():
    """Decaying bounces: quick, uneven, weakening taps each ring the same dense modes of the sheet."""
    chance = rng.standard_normal((30, 2))
    since = np.cumsum(from_db(4.5 * chance[:, 0])) / CHATTER_PER_S
    tap_db = CHATTER_DB - 60 * since / CHATTER_T60_S + 2.4 * chance[:, 1]
    taps = strikes(PANEL_BLOWS[0][0] + since, tap_db)
    sheet = shaped(pair(0.09, size=SR // 10) * from_db(-60 * TIME[:SR // 10] / 0.074),
                   [(200, -30), (600, -1), (1150, -4), (2000, 2), (3000, -8), (6000, -17.0), (14000, -45)])
    return from_db(-18) * signal.oaconvolve(taps[None], sheet, axes=1)[:, :N]


# blows on a wide panel as the tool lands and settles: [t/s, relative level/dB, hardness/dB]
PANEL_BLOWS = [(5.996, 0.5, 4.5), (6.061, -12.5, -8), (6.098, -9, -12), (6.128, -9.5, -12),
               (6.196, -9.5, -19)]
# modes of that panel: [f/Hz, level/dB, t60/s]
PANEL_MODES = [(147.6, -0.5, 0.51), (158.6, -2.5, 1.16), (173.9, -6, 1.2), (207, 9.5, .073), (286, -17, .1),
               (344, -11, 0.71), (395, -12.5, .35), (492, -21, .6), (660, -14, 0.54), (1070, -11.5, 0.37),
               (1118, -7, 0.13), (1175, -15, .3), (1220, -14, .28), (1436, -11, .22), (1510, -17, 0.38),
               (1572, -24, .36), (1900, -20, .32), (1990, -15, .28), (2686, -26, 0.26), (3252, -28, .34)]
# spectrum of the crash: [f/Hz, density/dB]
CRASH_SPECTRUM = [(59, -18), (100, -28), (155, 7.5), (213, -27), (407, -6), (524, -26), (1110, -8),
                  (1320, -8), (1460, -10.5), (6090, -23), (10100, -17), (13500, -25), (15000, -70)]


def landing():
    """Plate modes and damping: a wide panel on the left booms; the treble dies first, a low drone last."""
    s, db, hard = np.transpose(PANEL_BLOWS)
    boom = sum(radiate(strikes(s, db + level), hz, t60, .1) for hz, level, t60 in PANEL_MODES)
    hits = strikes(s, db + hard)
    crash = shaped(pair(0.074) * from_db(-19.0) * dying(hits, 0.14) * flutter(400, 1.9), CRASH_SPECTRUM)
    wash = shaped(pair(0.048) * dying(hits, 0.75) * flutter(160, 2.8),
                  [(80, -28), (170, -5), (300, 3.0), (600, 0.0), (1250, -1.5), (2100, -12.5),
                   (3000, -17), (6000, -27.0), (14000, -50)])
    drone = shaped(pair(0.9) * dying(hits, 2.7), LOW_SPECTRUM)
    leftward = (crash + settling() + from_db(-29.5) * wash) * from_db([[2.5], [-2.5]])
    return from_db(-22.0) * boom + from_db(-39.0) * drone + leftward


# left minus right for the wrench: [f/Hz, difference/dB]
WRENCH_BALANCE = [(100, -5), (250, -0.5), (500, -1.5), (1000, -4.5), (2000, 5), (3200, -3), (4800, -3.5),
                  (8000, -6), (13000, -3.5)]


def scene():
    """Interaural time and level: the wrench a little right, the far rush left; tool and hand bumps share the room."""
    wrench = thread() + bracket() + ratchet() + scrape()
    left = colour(delayed(wrench[:1], 0.00015), [(hz, db / 2) for hz, db in WRENCH_BALANCE])
    right = colour(wrench[1:], [(hz, -db / 2) for hz, db in WRENCH_BALANCE])
    near = np.vstack([left, right]) + thuds() + landing()
    rush_left, rush_right = far_rush() + glove()
    leftward = np.array([rush_left, delayed(rush_right, .0002)])
    chirps = insect()
    chirp_tail = workshop(chirps, t60=0.13, dull_hz=8000)
    far = leftward + from_db(7.0) * chirps + from_db(9.0) * chirp_tail
    return near + from_db(-12.0) * workshop(near, t60=0.091, dull_hz=2010) + far


CUTOFF_HZ = 14250


def record(dry):
    """Port resonance and saturation: the right port rings near 10 kHz, deep bass and top are cut, peaks rounded."""
    port = signal.lfilter(*signal.iirpeak(10130, 10, fs=SR), dry[1])
    ported = np.array([dry[0], dry[1] + from_db(0.5) * port])
    heard = signal.sosfilt(signal.butter(2, 62, "high", fs=SR, output="sos"), ported)
    return signal.sosfilt(signal.cheby1(10, .3, CUTOFF_HZ, fs=SR, output="sos"), np.tanh(heard))


dry = scene()
out = record(dry)
wav_out(out)
```